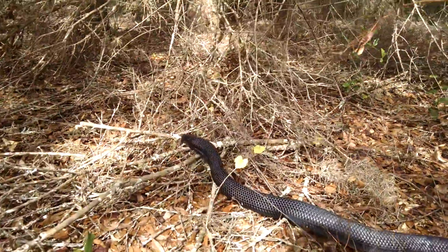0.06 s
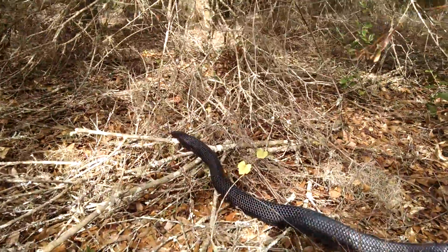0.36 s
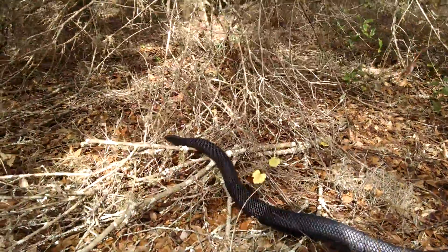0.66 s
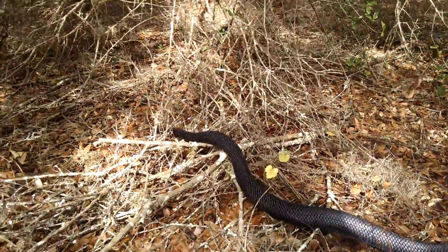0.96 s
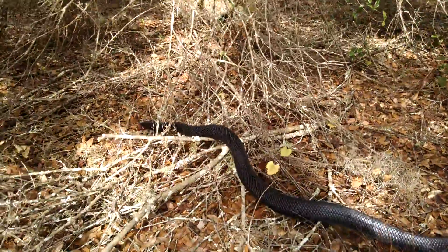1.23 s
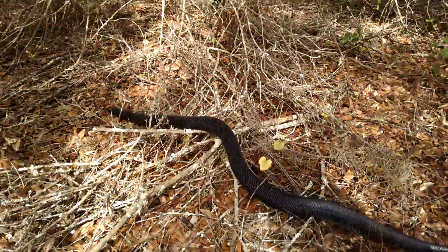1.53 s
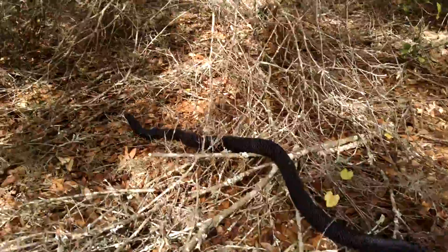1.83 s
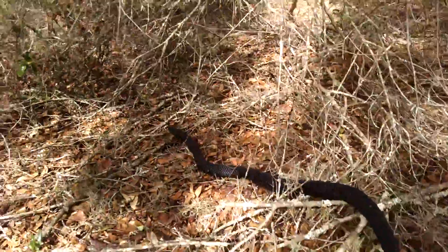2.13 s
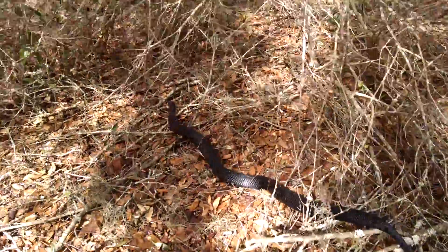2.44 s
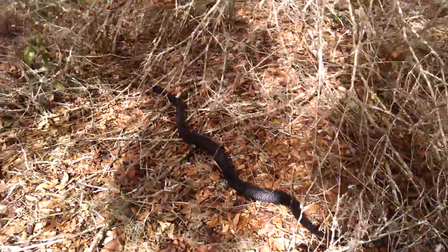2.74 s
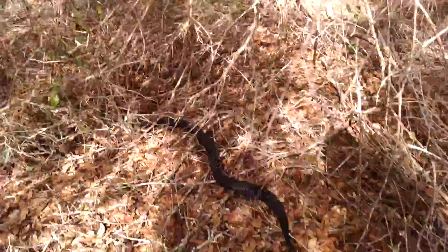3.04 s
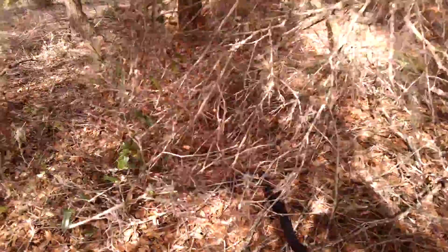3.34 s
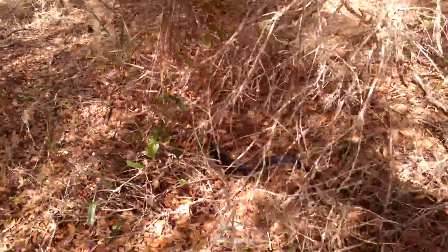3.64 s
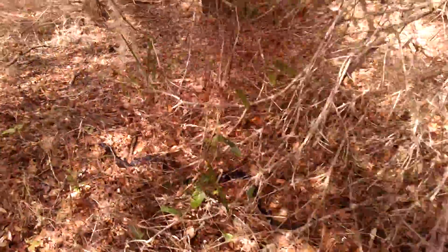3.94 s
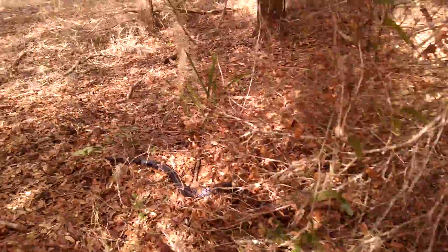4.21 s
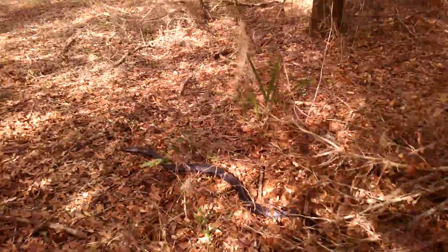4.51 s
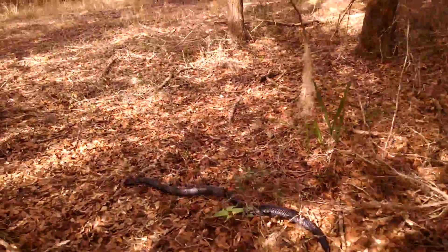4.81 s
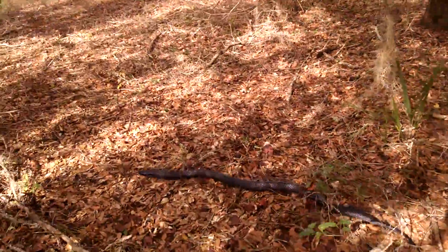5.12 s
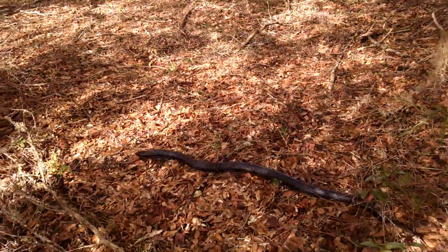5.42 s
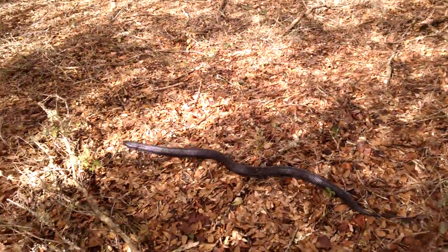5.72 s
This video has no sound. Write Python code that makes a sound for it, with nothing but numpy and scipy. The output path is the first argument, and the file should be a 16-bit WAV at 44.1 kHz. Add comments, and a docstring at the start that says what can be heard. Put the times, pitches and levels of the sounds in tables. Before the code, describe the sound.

Close, crisp rustling of dry leaves comes from a sliding snake and a person walking behind it in a wood. Low wind buffets the microphone at first, with one bump on the camera, then eases while soft footsteps crackle. Stronger gusts return midway as the steps grow heavier, sticks rasp and twigs snap. Hard puffs of wind thump the microphone near the end. A soft breeze sighs in the branches behind it all.

```python
"""Wind buffets the two ports of a microphone over a dry rustle: someone with a camera follows a snake
through a wood. Leaves crackle and crunch under each step in swarms of tiny breaks, sticks scrape, twigs
snap, and early on the camera body takes one knock. A breeze sighs in the trees; near the end hard puffs
of wind thump the microphone. The stereo is widened by subtracting from each channel a late copy of the
other."""
import sys
import numpy as np
from scipy import signal
from scipy.fft import rfft, irfft
from scipy.io import wavfile

SR = 44100
rng = np.random.default_rng(int(sys.argv[2]) if len(sys.argv) > 2 else 0)


def inscribe(sig):
    """Save sig as 16-bit PCM at rate SR to the path in sys.argv[1].

    A 1-D sig is mono; a 2-D sig holds one channel per row.
    Samples are clipped to [-1, 1] before scaling.
    """
    pcm = np.round(np.clip(np.atleast_2d(sig).T, -1, 1) * 32767)
    wavfile.write(sys.argv[1], SR, pcm.astype(np.int16))


N = 254456
TIME = np.arange(N) / SR
FREQS = np.fft.rfftfreq(N, 1 / SR)


def from_db(db):
    """Decibels to gain."""
    return 10 ** (np.asarray(db) / 20)


def unit_rms(x):
    """Scale to rms 1."""
    return x / np.sqrt(np.mean(x ** 2) + 1e-20)


def eq_curve(points):
    """Gain at every frequency from (f/Hz, level/dB) breakpoints."""
    hz, db = np.transpose(points)
    return from_db(np.interp(np.log(FREQS + 1), np.log(hz), db))


def filtered(x, gain):
    """Filter by a gain per frequency."""
    return irfft(rfft(x) * gain, N)


def rolloff(x, width):
    """A bell curve: 1 at zero, one half at the given width."""
    return 1 / (1 + (x / width) ** 2)


def drift(rate_hz):
    """Smooth random modulation at rms 1."""
    return unit_rms(filtered(rng.standard_normal(N), rolloff(FREQS, rate_hz)))


def add(out, t, sound):
    """Mix a short sound in at t seconds."""
    start = round(t * SR)
    out[:, start:start + sound.shape[-1]] += sound[..., :N - start]


def at_ports(pair, spectrum, apart_hz):
    """Sound from many directions: two close ports hear long waves alike, short ones differently."""
    alike = rolloff(FREQS, apart_hz)
    mid = filtered(pair[0], eq_curve(spectrum) * np.sqrt(1 + alike))
    side = filtered(pair[1], eq_curve(spectrum) * np.sqrt(1 - alike))
    return unit_rms(np.array([mid + side, mid - side]))


# tone of the far branches: f/Hz, level/dB
TREE_EQ = [(20, -1.5), (90, 12), (140, 1.5), (380, -1), (700, -6.5), (1200, -10), (2000, -17.5),
           (4500, -16.5), (9000, -17), (15500, -25)]

def trees(level_db=-38.0, sway_db=0.34):
    """The background bed: a breeze in the far branches, a smooth low sigh."""
    sigh = at_ports(rng.standard_normal((2, N)), TREE_EQ, apart_hz=895)
    return from_db(level_db + sway_db * drift(rate_hz=4.2)) * sigh


# gusts over the ports: crest t/s, level/dB, swell or fade time/s
GUST_CUES = [(.12, -27, 0.24), (.625, -28, 0.095), (2.77, -23, 0.22), (3.129, -23, 0.15),
             (3.4, -26.5, 0.14), (4.23, -24.5, 0.093), (4.51, -24, 0.099), (4.78, -32, 0.17),
             (5.121, -28, 0.035), (5.38, -29, 0.065), (5.595, -24, 0.096)]

def air_flow(breeze_db=-42):
    """The wind's envelope in dB: bell-shaped gusts on a light breeze."""
    gusts = sum(from_db(db) ** 2 * rolloff(TIME - t, swell_s) ** 3 for t, db, swell_s in GUST_CUES)
    return 10 * np.log10(from_db(breeze_db) ** 2 + gusts)


# tone of the turbulence: f/Hz, level/dB
WIND_EQ = [(10, 1.5), (25, -0.5), (60, 2), (105, -1), (260, -15.5), (370, -22.5), (600, -44), (1500, -67)]

def wind(trim_db=0.5, split_hz=170, small_boost_db=7.5, flutter_db=2.4):
    """Turbulence on each port separately; faster air is louder and its smaller eddies are brighter."""
    flow_db = air_flow()
    air = unit_rms(filtered(rng.standard_normal((2, N)), eq_curve(WIND_EQ)))
    gust_db = flow_db + flutter_db * drift(rate_hz=30)
    large_eddies = filtered(air, rolloff(FREQS, split_hz))
    small_eddies = (air - large_eddies) * from_db(small_boost_db + np.minimum(gust_db - flow_db.max(), 0))
    return from_db(gust_db + trim_db) * (large_eddies + small_eddies)


def swing(t, hz, phase, width_cycles):
    """One pointed swing of pressure centred on t seconds."""
    cycles = (TIME - t) * hz
    window = rolloff(cycles, width_cycles) ** 2 * (np.abs(cycles) < 2)
    return window * np.cos(2 * np.pi * (cycles + phase))


# single eddies hitting a port: t/s, level/dB, f/Hz
EDDY_HITS = [(.055, -9, 240), (0.139, -1.5, 105), (0.153, -2, 94), (.185, -5.5, 164), (0.471, -7, 84),
             (0.624, -5.5, 118), (2.704, -4, 101), (2.762, -7, 249), (2.847, -2, 133), (2.874, 0, 95),
             (2.893, -11, 190), (2.9673, -3, 168), (3.059, -1, 154), (3.089, -4, 149), (3.121, 2, 210),
             (3.158, -6, 215), (3.181, -0.5, 152), (4.254, -2.5, 137), (5.409, -11, 70), (5.543, -2.5, 80),
             (5.568, -6, 119), (5.606, -7, 130), (5.628, -5.5, 100)]

def buffets(suction=0.087):
    """Each eddy gives one swing of pressure, pushing on the right port while it sucks at the left."""
    push = sum(from_db(db) * swing(t, hz, rng.random(), width_cycles=0.36) for t, db, hz in EDDY_HITS)
    return np.array([-suction * push, push])


# hard, dull puffs of wind: t/s, level/dB, f/Hz
PUFF_HITS = [(5.5825, -2.5, 344), (5.5864, -4, 237), (5.5942, 0, 240), (5.664, -7.5, 190), (5.69, -13, 149)]

def puffs(right_share=0.11):
    """Each puff of wind thumps the microphone with one compact push, stronger on the left."""
    push = sum(from_db(db) * swing(t, hz, 0, width_cycles=0.37) for t, db, hz in PUFF_HITS)
    return np.array([push, right_share * push])


# snake and walker drag through the litter throughout: t/s, crackle level/dB, crunch level/dB
DRAG_ENVELOPE = [(0, -47, -39), (.62, -51.5, -53.5), (1.22, -49, -44), (1.75, -42, -39.5),
                 (2.9, -51.5, -45), (3.32, -35.5, -38), (3.46, -39.5, -39.5), (3.78, -43, -36),
                 (4.22, -35.5, -35), (4.48, -44.5, -37), (4.73, -42.5, -36.5), (4.95, -46, -47),
                 (5.66, -48.5, -39.5)]
# a foot presses or scuffs the leaves: t/s, crackle level/dB, crunch level/dB, hold/s
FOOTSTEPS = [(.36, -43.5, -64, .03), (.95, -43.5, -63, 0.017), (1.362, -35.5, -43, 0.045),
             (1.581, -42, -59, 0.12), (1.95, -49, -35.5, 0.028), (2.071, -41.5, -38, 0.031),
             (2.27, -43, -50, 0.049), (3.027, -28.5, -31, 0.023), (3.135, -29, -31, 0.056),
             (3.956, -28.5, -32, 0.051), (4.65, -38.5, -56, 0.034), (4.802, -28.5, -25.5, 0.028),
             (5.23, -44.5, -67, 0.011), (5.737, -33.5, -30, .04)]

def load_on_leaves(attack_db_per_s=219.5, release_db_per_s=178, catch_db=2.12):
    """Crackle and crunch envelopes in dB: steps swell, hold and fade over a drag that catches and slips."""
    times, *levels = np.transpose(DRAG_ENVELOPE)
    drag_db = np.array([np.interp(TIME, times, db) for db in levels])
    power = from_db(drag_db + catch_db * drift(rate_hz=16)) ** 2
    for t, crackle_db, crunch_db, hold_s in FOOTSTEPS:
        attack_db = attack_db_per_s * np.maximum(t - TIME, 0)
        release_db = release_db_per_s * np.maximum(TIME - t - hold_s, 0)
        power += from_db(np.array([[crackle_db], [crunch_db]]) - attack_db - release_db) ** 2
    return 10 * np.log10(power)


def fractures(per_s, spread_db, t60):
    """Power of tiny random breaks, many weak and a few strong, each dying fast; mean 1."""
    onsets = rng.random(N) < per_s / SR
    grains = onsets * from_db(spread_db * np.minimum(rng.exponential(1, N), 4)) ** 2
    decay = from_db(-60 / (t60 * SR)) ** 2
    power = signal.lfilter([1], [1, -decay], grains + 1e-18) / per_s  # density leaves the level alone
    return power / power.mean()


# tone of the packed leaf layer: f/Hz, level/dB
CRUNCH_EQ = [(120, -20), (300, 0), (550, 1), (900, -5), (1500, -7.5), (2100, -10), (4000, -15.5)]

def crunch(level_db):
    """The body of a step: packed leaves underneath give way in dull, overlapping breaks."""
    grains = rng.standard_normal((2, N)) * np.sqrt(fractures(per_s=900, spread_db=0.5, t60=0.015))
    return from_db(level_db) * at_ports(grains, CRUNCH_EQ, apart_hz=1900)


# tone of the brittle top leaves: f/Hz, level/dB
CRACKLE_EQ = [(900, -0.5), (2000, -3.5), (3000, 2.5), (4500, 2.5), (8000, 4), (11000, 1.5), (15500, -1)]

def crackle(level_db, crowding=0.25, near_db=20.0, broad_share=0.58):
    """Brittle leaves rub and break: some breaks cover the whole treble, others one small leaf's band."""
    weight_db = level_db - level_db.mean()
    per_s = 1200 * from_db(crowding * weight_db)  # more weight breaks more leaves
    broad = fractures(per_s, spread_db=2.2, t60=0.0065)
    edges_hz = [0, *np.geomspace(3000, 12000, num=4), SR]
    noise, grains = rng.standard_normal((2, N)), 0
    for low, high in zip(edges_hz, edges_hz[1:]):
        narrow = fractures(per_s, spread_db=2.2, t60=0.0065)
        band = filtered(noise, (FREQS >= low) & (FREQS < high))
        grains = grains + band * np.sqrt(broad_share * broad + (1 - broad_share) * narrow)
    # loud crackle comes from one spot underfoot, faint crackle from all round
    near = np.clip(weight_db / near_db, 0, 1)
    underfoot = at_ports(grains, CRACKLE_EQ, apart_hz=3770)
    around = at_ports(grains, CRACKLE_EQ, apart_hz=1100)
    return from_db(level_db) * (near * underfoot + (1 - near) * around)


def crack(hz, t60=0.0048, width_octaves=0.74, broad=0.1, tail_db=-17, tail_t60=0.04):
    """One brittle break: a burst, strongest where the piece rings, with scatter from the ground."""
    age = np.arange(SR // 20) / SR
    direct = rng.standard_normal(len(age)) * from_db(-60 * age / t60)
    scatter = rng.standard_normal((2, len(age))) * from_db(tail_db - 60 * age / tail_t60)
    octaves = np.log2((np.fft.rfftfreq(len(age), 1 / SR) + 1) / hz)
    resonance = broad + rolloff(octaves, width_octaves)
    sound = irfft(rfft(direct + scatter) * resonance, len(age))
    far_port, lag_s = rng.integers(2), rng.uniform(0, 0.00005)
    sound[far_port] = np.roll(sound[far_port], round(lag_s * SR))
    # every crack carries the energy of 2 ms at rms 1
    return sound / np.sqrt(np.sum(sound ** 2, axis=1, keepdims=True) / (0.002 * SR))


def leaf_ticks(level_db, count=240, low_hz=3850, high_hz=12860, tracking=0.85, spread_db=5, trim_db=1):
    """Single leaves flick back, each at its own pitch; more of them, and louder, under more weight."""
    usual_db = level_db.mean() + tracking * (level_db - level_db.mean()) + trim_db
    chance = np.cumsum(from_db(0.5 * level_db))
    out = np.zeros((2, N))
    for when, pitch, strength in rng.random((count, 3)):
        start = np.searchsorted(chance, when * chance[-1])
        hz = low_hz * (high_hz / low_hz) ** pitch
        tick_db = usual_db[start] + spread_db * (2 * strength - 1)
        add(out, start / SR, from_db(tick_db) * crack(hz, width_octaves=0.084, broad=0.06))
    return out


# sticks rubbing: t/s, level/dB, f/Hz
SCRAPE_CUES = [(1.413, -36, 1350), (1.437, -29.5, 700), (1.634, -31.5, 1040), (1.694, -33, 550),
               (3.964, -25, 1240), (4.01, -27.5, 730)]

def scrapes():
    """A stick slips over another: a short, woody rasp in the centre."""
    out = np.zeros((2, N))
    for t, db, hz in SCRAPE_CUES:
        add(out, t, from_db(db) * crack(hz, t60=0.048, width_octaves=0.34, broad=0.011)[0])
    return out


# single dry leaves breaking: t/s, level/dB
LEAF_HITS = [(0.756, -25.5), (1.2513, -35), (1.4916, -26), (1.5334, -34), (1.608, -39), (1.646, -43),
             (2.007, -31), (2.2722, -29), (2.305, -29.5), (2.5103, -30), (3.1425, -26), (3.2031, -18.5),
             (3.2228, -28), (3.3826, -27), (3.9527, -27), (3.9777, -22), (4.0307, -23.5), (4.0673, -29),
             (4.1105, -18), (4.114, -26), (4.204, -26), (4.245, -29), (4.4024, -26), (4.6453, -33),
             (4.847, -16.5), (4.8528, -18), (4.875, -27), (5.175, -28.5), (5.399, -35), (5.5448, -31),
             (5.7595, -22.5)]

def leaf_cracks(trim_db=1.0, centre_hz=7800, spread_octaves=0.2):
    """A leaf cracks through: bright and dry, with no knock of wood."""
    out = np.zeros((2, N))
    for (t, db), detune in zip(LEAF_HITS, rng.standard_normal(len(LEAF_HITS))):
        add(out, t, from_db(db + trim_db) * crack(centre_hz * 2 ** (spread_octaves * detune)))
    return out


def ring(cycles, decay_cycles):
    """A sine that falls 60 dB in decay_cycles."""
    return np.sin(2 * np.pi * cycles) * from_db(-60 * cycles / decay_cycles)


# higher bending modes of a thin stick: ratio to the knock's pitch, level/dB
TWIG_MODES = [(2.76, 1), (5.4, -4)]
# twigs breaking, and one low knock on the camera body at 0.29 s:
# t/s, crack level/dB, crack f/Hz, knock f/Hz, knock level/dB
SNAP_AND_KNOCK_HITS = [(0.2911, -34.5, 2620, 600, -17), (0.5603, -33, 3360, 1320, -24),
                       (1.942, -30, 9100, 790, -14), (2.035, -41, 3600, 1420, -16),
                       (2.093, -52, 3270, 1340, -20), (3.17, -38, 5000, 1180, -17),
                       (3.2365, -27, 6000, 900, -20), (3.4848, -21.5, 10000, 1720, -13.5),
                       (3.9847, -32, 4000, 1200, -10), (3.9927, -27, 3700, 1700, -20),
                       (4.072, -32, 6400, 1100, -22), (4.0772, -37, 4000, 1200, -19.5),
                       (4.8048, -17, 10000, 1070, -8.5), (4.8246, -22, 7500, 980, -11),
                       (4.911, -47, 3500, 1220, -16.5), (4.9208, -28, 2960, 1350, -12.5),
                       (5.0412, -26, 3700, 1210, -23), (5.1186, -26, 6140, 1420, -19),
                       (5.382, -29.5, 5200, 1540, -25), (5.4219, -19, 5100, 1390, -18),
                       (5.6122, -26.5, 4770, 1620, -32), (5.7347, -16.5, 11000, 660, -17),
                       (5.7407, -28, 8000, 1100, -18)]

def snaps_and_knock(trim_db=0.5, overtone_db=-8.0, thin_hz=1700, damping_db_per_octave=30):
    """A twig snaps or the camera is knocked: a crack and a short ring; only thin twigs ring overtones."""
    out, age = np.zeros((2, N)), np.arange(SR // 20) / SR
    for t, crack_db, crack_hz, knock_hz, knock_db in SNAP_AND_KNOCK_HITS:
        cycles = age * knock_hz
        thin_db = overtone_db + damping_db_per_octave * min(np.log2(knock_hz / thin_hz), 0)
        overtones = sum(from_db(thin_db + db) * ring(cycles * ratio, 16) for ratio, db in TWIG_MODES)
        knock = ring(cycles, decay_cycles=3.44) + overtones
        hit = from_db(crack_db) * crack(crack_hz) + from_db(knock_db) * knock
        add(out, t, from_db(trim_db) * hit)
    return out


def scene(crackle_trim_db=1.5, crunch_trim_db=-3.0, rumble_ceiling=0.55):
    """The mix: trees all round, wind on the ports, leaves and twigs close by."""
    top_db, pressed_db = load_on_leaves()
    crackle_db, crunch_db = top_db + crackle_trim_db, pressed_db + crunch_trim_db
    rustle = crackle(crackle_db) + leaf_ticks(crackle_db) + crunch(crunch_db)
    accents = snaps_and_knock() + leaf_cracks() + scrapes()
    pressure = wind() + buffets() + puffs()
    rumble = rumble_ceiling * np.tanh(pressure / rumble_ceiling)  # rounds off the strongest swings
    return trees() + rumble + rustle + accents


# tone of the duller right port: f/Hz, level/dB
RIGHT_PORT_EQ = [(100, 1.5), (1000, -1.5), (3500, -0.5), (5000, -3), (8000, -6.5), (15000, -9)]
# share of the other channel that the widener subtracts: f/Hz, level/dB
WIDENER_EQ = [(200, -4), (2500, -2.65), (2850, -0.9), (3700, -11.5), (5100, -7), (6400, -16.5),
              (15000, -30)]

def record(dry, widener_delay_s=0.0003888, cutoff_hz=15700):
    """The right port is duller; the widener lifts the wind rumble and combs the treble; the top is cut."""
    ports = np.array([dry[0], filtered(dry[1], eq_curve(RIGHT_PORT_EQ))])
    crossfeed = eq_curve(WIDENER_EQ) * np.exp(-2j * np.pi * FREQS * widener_delay_s)
    wide = ports - filtered(ports[::-1], crossfeed)
    high_cut = signal.ellip(10, 0.1, 80, cutoff_hz, fs=SR, output="sos")
    return signal.sosfilt(high_cut, wide)


dry = scene()
out = record(dry)
inscribe(out)
```